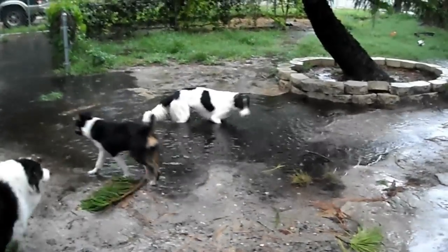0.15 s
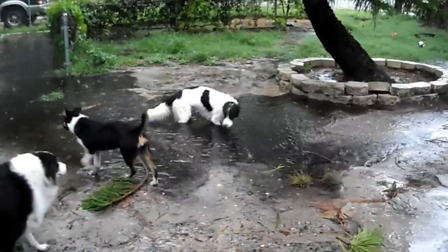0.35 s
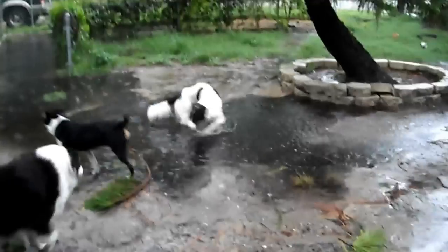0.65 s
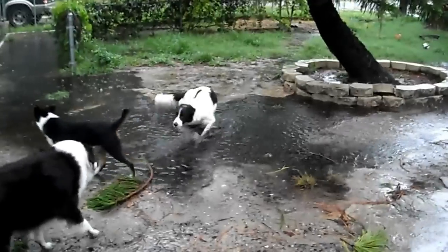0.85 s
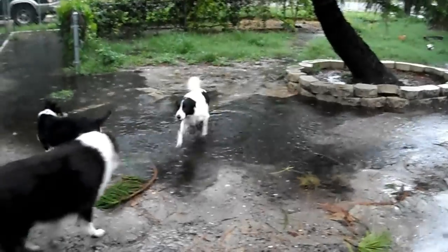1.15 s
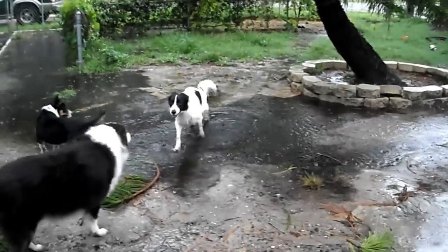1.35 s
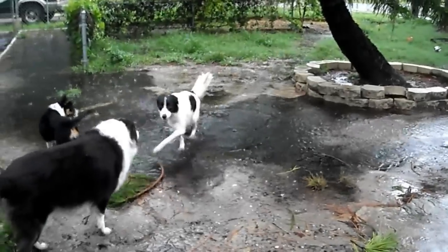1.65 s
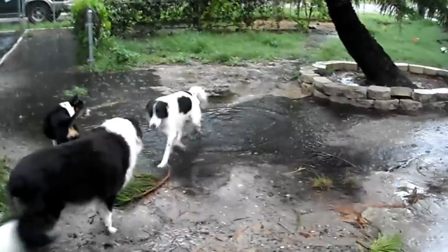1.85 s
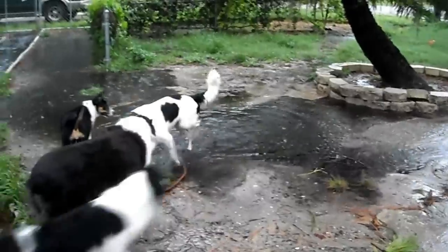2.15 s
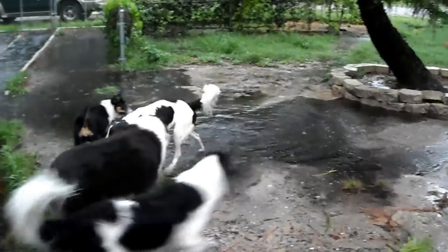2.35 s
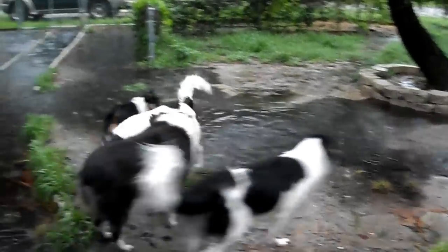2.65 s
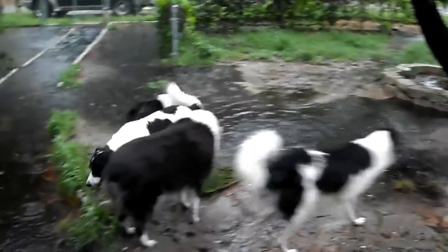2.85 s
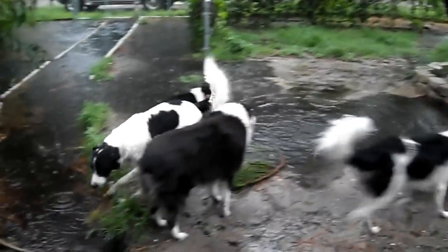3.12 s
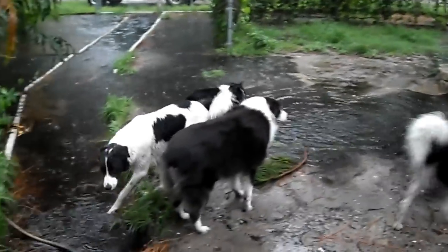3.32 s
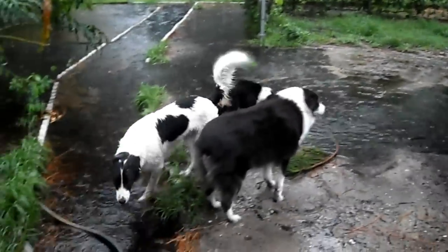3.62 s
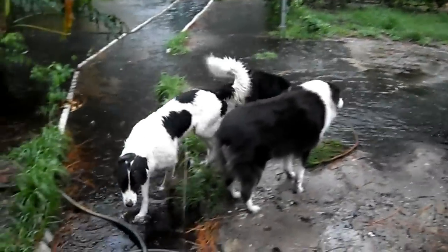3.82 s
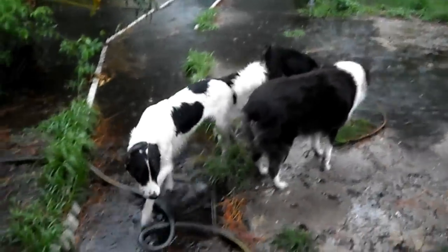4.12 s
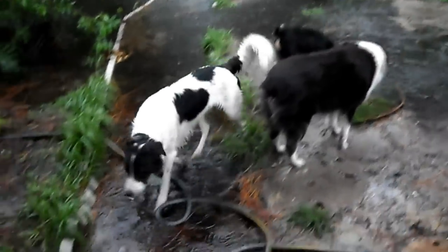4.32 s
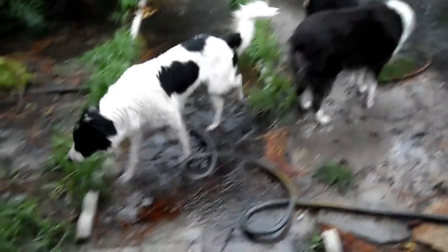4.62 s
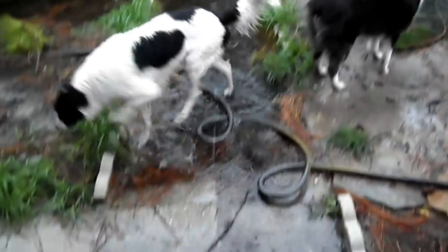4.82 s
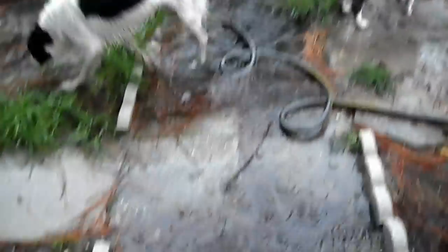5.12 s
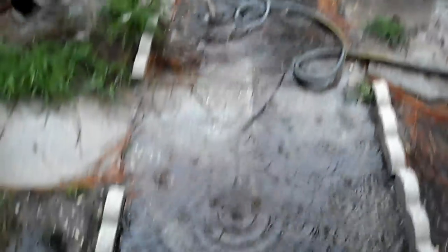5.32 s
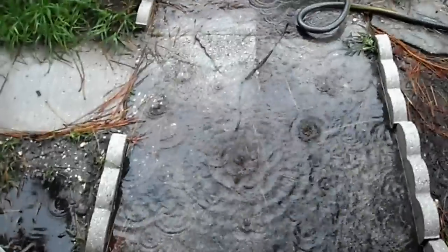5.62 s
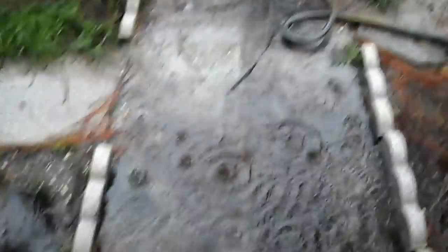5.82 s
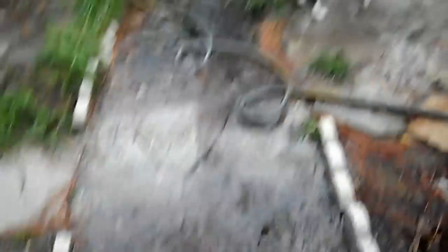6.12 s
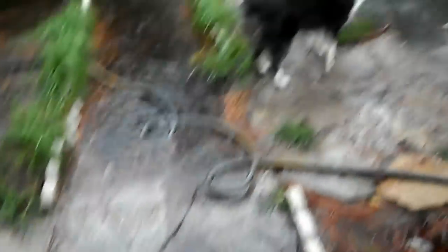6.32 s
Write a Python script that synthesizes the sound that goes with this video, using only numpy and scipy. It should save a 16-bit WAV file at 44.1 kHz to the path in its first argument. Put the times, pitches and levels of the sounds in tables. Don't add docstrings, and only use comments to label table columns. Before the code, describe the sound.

A small close microphone, practically mono, hears steady rain on puddles. Distant drops blur into a quiet hiss with a faint low hum; nearer ones fizz, click and plip with short rising bubble notes. Hard, dry taps of drops on the housing stand far above the rest early on. Two abrupt silences interrupt the start, then splashes become denser until the end.

```python
import sys
import numpy as np
from scipy import signal
from scipy.fft import rfft, irfft
from scipy.io import wavfile
from scipy.ndimage import uniform_filter1d

SR = 44100
rng = np.random.default_rng(int(sys.argv[2]) if len(sys.argv) > 2 else 0)


def wrap_up_sound(samples):
    columns = np.atleast_2d(samples).T
    tamed = np.clip(columns, -1, 1)
    steps = np.round(tamed * 32767).astype(np.int16)
    wavfile.write(sys.argv[1], SR, steps)


def attenuation_scalar(level_db):
    decades = np.asarray(level_db, float) / 20
    return 10 ** decades


N = 285327

# (frequency [Hz], density [dB per Hz])
WASH_SPECTRUM = [(25, -11.5), (40, -7.5), (56, 1.5), (80, -4), (110, -4), (200, -5.5), (420, -4), (700, -1),
                 (2300, -1.5), (3400, -3), (5200, -5.5), (9000, -9), (12000, -12.5), (15600, -15)]
# (time [s], rain strength [dB])
RAIN_SWELL = [(0, -49), (.64, -47), (1.25, -47.5), (1.89, -47.5), (2.31, -47.5), (2.9, -47.5), (3.5, -47.5),
              (4.0, -48), (4.6, -47.5), (5.15, -47), (5.4, -48), (6.0, -47), (6.47, -48.5)]
# (time [s], peak [dB], centre [Hz])
SPLASHES = [(0.0532, -32, 8540), (0.7142, -27.5, 5040), (1.291, -30.5, 4870), (1.596, -25.5, 6690),
            (1.8384, -23, 5300), (2.3549, -27.5, 4530), (2.4115, -19, 10600), (2.558, -28, 9220),
            (3.4577, -27.5, 7600), (3.4978, -29, 5070), (3.601, -24.5, 8720), (3.636, -23, 6130),
            (3.6784, -31, 8980), (3.8375, -26, 9000), (4.0061, -22, 8430), (4.2494, -28.5, 6000),
            (4.4447, -25.5, 6430), (4.6525, -22.5, 7220), (4.7226, -23.5, 6160), (4.78, -23.5, 7140),
            (4.8503, -28, 9220), (5.0773, -28.5, 4840), (5.0968, -26, 7360), (5.1316, -30.5, 5270),
            (5.2231, -18.5, 6240), (5.3844, -24.5, 8600), (5.4519, -22, 5600), (5.5079, -24.5, 6310),
            (5.9089, -29.5, 5160), (6.0102, -24, 5300)]
# (time [s], peak [dB], centre [Hz])
FURTHER_SPRAYS = [(2.5092, -27, 11600), (2.7456, -27.5, 11510), (2.7694, -32, 13100), (3.0584, -32.5, 10800),
                  (3.1283, -31, 10000), (4.0517, -29, 8500), (4.056, -29, 14500), (4.027, -31, 8500),
                  (5.297, -28, 9000), (3.537, -29.5, 9800), (4.2398, -31.5, 13800), (4.2594, -28, 9860),
                  (4.4962, -25, 11100), (4.6294, -27, 13100), (4.7092, -27.5, 10200), (5.002, -28, 12800),
                  (5.0866, -24.5, 9930), (5.617, -30, 9050), (5.6494, -36.5, 11500), (5.7788, -36, 9510),
                  (6.4094, -24, 14300)]
# (time [s], peak [dB], pitch [Hz], slosh [dB])
BUBBLES = [(0.1528, -42, 2587, -7.5), (0.7527, -44.5, 3656, -2.5), (2.9596, -43.5, 703, -2),
           (0.915, -39.5, 761.3, -4), (1.2359, -42, 1500, -7.5), (1.4438, -39.5, 2520, -8.5),
           (2.7474, -44, 4175, -13), (1.6587, -47, 1453, 4), (1.7881, -44, 4180, -8.0),
           (1.8386, -41.5, 2680, -9.5), (2.356, -43, 3530, -11), (2.356, -44.5, 1374, -6.5),
           (2.4152, -48, 690, 1.5), (2.5018, -45.5, 2390, -8.0), (2.9347, -38.5, 2370, -12),
           (5.077, -40, 2325, -5.5), (3.6072, -43.5, 3890, 3.5), (3.6343, -41, 4890, -8.5),
           (3.6443, -43.5, 2630, -4), (4.002, -44.5, 2574, -2.5), (5.8577, -45.5, 2893, -5.5),
           (4.757, -42.5, 2825, -1), (4.9124, -40, 3050, -6.5), (5.0905, -39.5, 2807, -3),
           (5.1297, -44.5, 4565, -3.5), (5.307, -44.5, 2928, -1.5), (5.854, -35.5, 1721, -5.5),
           (6.1014, -42.5, 2040, -7.5), (6.1014, -41.5, 3267, -11.5), (6.2901, -37, 3140, -8.5)]
# (time [s], peak [dB], brightness [dB])
CRACKS = [(0.0549, -29.5, -0.5), (1.292, -23, -0.5), (1.8417, -31, 6.5), (1.849, -21.5, -1.5),
          (2.3567, -20.5, 5.5), (2.414, -17, 1), (2.572, -24, 2.5), (3.0168, -28, 3), (3.5986, -28, -3.5),
          (3.601, -26, -3), (3.6384, -18.5, 3.5), (4.0084, -21.5, -1.5), (4.4474, -31, -1.5),
          (4.6605, -26, -0.5), (4.7812, -25.0, -2), (4.784, -31, -1), (5.0085, -31, 4),
          (5.1324, -25.5, 2.5), (5.136, -19.5, 8.5), (5.2244, -22, -1.5), (4.915, -29, -7),
          (0.9579, -20.5, 4), (5.454, -21.5, 0.5), (5.4576, -22.5, 3), (5.652, -26, 2.5), (5.665, -26.5, 1),
          (5.7801, -29.5, 1.5), (6.2939, -24.5, -8), (4.3964, -29.5, 2), (6.3646, -29, 3)]
# (time [s], peak [dB], tilt above 6 kHz [dB per octave])
MIDDLE_HITS = [
    (.0742, -5.5, 1.5),
    (.9551, -27, -14),
    (.957, -21.5, -5.5),
    (1.7589, -5, 0),
    (3.3425, -22.5, -9.5),
]
# (time [s], peak [dB], tilt above 6 kHz [dB per octave])
EDGE_HITS = [
    (.8424, -9, 0.42),
]
# (frequency [Hz], level [dB], t60 [ms], lag [ms])
MIDDLE_RINGS = [(2530, -9.5, 5.3, 0.23), (3407, -3.5, 5.3, 0.22), (4017, -1, 3.4, 0.31),
                (6780, -2.5, 3.2, .25), (8416, -3.5, 3.6, 0.044), (9625, 4, 1.76, 0.121),
                (12130, -5, 1, 0.027), (13800, -1, 1.1, 0.136)]
# (frequency [Hz], level [dB], t60 [ms], lag [ms])
EDGE_RINGS = [(3338, -3.5, 4.8, .05), (4517, .5, 4.1, .4), (5780, -10, 5.5, .6), (8025, -4, 3.5, .55),
              (9520, 3.5, 2.3, 0.8), (10570, 7, 1.3, 0.69), (14810, 6.5, 1.1, .75)]
# (start [s], end [s])
GAPS = [
    (.2081, .6382),
    (1.89, 2.3101),
]
# (time [s], low edge [Hz], high edge [Hz])
PUFFS = [(1.027, 11000, 12400), (1.097, 9600, 11000), (2.699, 11000, 12400), (2.699, 13100, 14500),
         (2.838, 4300, 5200), (2.838, 8300, 11700), (2.838, 13800, 15200), (3.906, 6300, 7600),
         (3.906, 8300, 10400), (4.115, 12400, 13800), (4.812, 4700, 5700), (5.206, 5700, 7600),
         (5.206, 9600, 11000), (5.415, 6900, 9000), (5.415, 14500, 15800), (6.437, 5200, 6300),
         (6.437, 14500, 15800)]


def evened(x):
    return x / np.sqrt(np.mean(x ** 2) + 1e-20)


def add(mix, time_s, sound):
    part = mix[round(time_s * SR):][:len(sound)]
    part += sound[:len(part)]


def ring(t, hz, t60_s, rise=0.):
    phase = 2 * np.pi * hz * (t + rise * t ** 2 / (2 * t60_s))
    return attenuation_scalar(-60 * t / t60_s) * np.sin(phase)


def band(x, centre_hz, width_octaves):
    hz = np.fft.rfftfreq(len(x), 1 / SR) + 1
    bell = np.exp(-.5 * (np.log2(hz / centre_hz) / width_octaves) ** 2)
    return irfft(rfft(x) * bell, len(x))


def wash():
    patchy_db, flicker_db = 1.08, 0.93
    mean_db, bright_per_db = -47.5, -1.31
    hop, size = 128, 512
    frames, hz = N // hop + 5, np.fft.rfftfreq(size, 1 / SR)
    real, imag, patches = rng.standard_normal((frames, len(hz), 3)).T
    patches = uniform_filter1d(patches, size=10, axis=0)
    patches = evened(uniform_filter1d(patches, size=12, axis=1))
    flicker = evened(uniform_filter1d(rng.standard_normal(frames), size=5))

    time_s, strength_db = np.transpose(RAIN_SWELL)
    bright_db = bright_per_db * (strength_db - mean_db)
    frame_s = np.arange(frames) * hop / SR
    treble_share = np.clip(hz / 9000, 0, 1.3)[:, None]
    treble_db = flicker_db * flicker + np.interp(frame_s, time_s, bright_db)
    field = (real + 1j * imag) * attenuation_scalar(patchy_db * patches + treble_share * treble_db)
    white = evened(signal.istft(field, nperseg=size, noverlap=size - hop)[1][:N])

    colour_hz, colour_db = np.transpose(WASH_SPECTRUM)
    log_hz = np.log(np.fft.rfftfreq(N, 1 / SR) + 1)
    colour = attenuation_scalar(np.interp(log_hz, np.log(colour_hz + 1), colour_db))
    swell = attenuation_scalar(np.interp(np.arange(N) / SR, time_s, strength_db) + 3.5)
    return evened(irfft(rfft(white) * colour, N)) * swell


def patter(per_s, low_hz, high_hz, cycles, rise, spread_db, level_db):
    pitches = 24
    sign = np.sign(rng.random(N) - .5)
    size = attenuation_scalar(spread_db * np.minimum(rng.exponential(1, N), 4))
    drops = sign * size * (rng.random(N) < per_s / SR)
    kind = rng.integers(0, pitches, N)
    out, t = np.zeros(N), np.arange(1500) / SR
    for k, hz in enumerate(np.geomspace(low_hz, high_hz, pitches)):
        out += signal.oaconvolve(drops * (kind == k), ring(t, hz, cycles / hz, rise))[:N]
    return attenuation_scalar(level_db) * evened(out)


def crackle():
    drops = patter(per_s=260, low_hz=4000, high_hz=13000, cycles=4.5, rise=0., spread_db=2.3, level_db=-55.5)
    return band(drops, 9000, .9)


def plops():
    return patter(per_s=200, low_hz=1200, high_hz=5000, cycles=32., rise=.2, spread_db=4.2, level_db=-57.5)


def puffs(rain):
    length, level_db = 2048, -2.5
    out, hz = np.zeros(N), np.fft.rfftfreq(length, 1 / SR)
    for time_s, low_hz, high_hz in PUFFS:
        start = rng.integers(3 * SR, 6 * SR)
        other = rfft(rain[start:][:length]) * (hz > low_hz) * (hz < high_hz)
        add(out, time_s - length / 2 / SR, attenuation_scalar(level_db) * irfft(other) * np.hanning(length))
    return out * np.array([[1], [-1]])


def bubbles():
    t60_s, rise = .025, .2
    out, t = np.zeros(N), np.arange(4096) / SR
    onset = 1 - np.exp(-t / 0.0006)
    for time_s, peak_db, hz, slosh_db in BUBBLES:
        water = evened(band(rng.standard_normal(len(t)), hz, 0.57))
        slosh = attenuation_scalar(slosh_db - 60 * t / t60_s) * water
        add(out, time_s + .002, attenuation_scalar(peak_db + 6.5) * (ring(t, hz, t60_s, rise) + slosh) * onset)
    return out


def spray(peak_db, centre_hz, t60_s, width_octaves):
    t = np.arange(4096) / SR
    lumps_db = 1.6 * evened(uniform_filter1d(rng.standard_normal(len(t)), size=30))
    droplets = rng.standard_normal(len(t)) * attenuation_scalar(lumps_db)
    envelope = attenuation_scalar(-60 * t / t60_s) * (1 - np.exp(-t / 0.00047))
    return attenuation_scalar(peak_db - 16.0) * evened(band(droplets, centre_hz, width_octaves)) * envelope


def splashes():
    out, delay_s = np.zeros(N), .0012
    for time_s, peak_db, hz in SPLASHES:
        t60_s = .045 * attenuation_scalar(0.63 * (peak_db + 30.5))
        add(out, time_s + delay_s, spray(peak_db, hz, t60_s, width_octaves=0.33))
    for time_s, peak_db, hz in FURTHER_SPRAYS:
        add(out, time_s + delay_s, spray(peak_db, hz, t60_s=0.04, width_octaves=.3))
    return out


def cracks():
    out, t = np.zeros(N), np.arange(-128, 128) / SR
    for time_s, peak_db, bright_db in CRACKS:
        pulse = .4 * rng.standard_normal(len(t)) - 1. * (t == 0)
        click = band(pulse * attenuation_scalar(-60 * abs(t) / .001), 8000 * attenuation_scalar(bright_db), .5)
        add(out, time_s + t.min(), attenuation_scalar(peak_db - 0.5) * click / abs(click).max())
    return out


def ticks():
    out, t = np.zeros(N), np.arange(500) / SR
    for hits, rings in ((MIDDLE_HITS, MIDDLE_RINGS), (EDGE_HITS, EDGE_RINGS)):
        hz, ring_db, t60_ms, lag_ms = np.transpose(rings)[..., None]
        since = np.maximum(t - lag_ms / 1000, 0)
        swell = (1 - np.exp(-since * hz / 1.3)) ** 2
        parts = ring(since, hz, t60_ms / 1000) * swell
        octaves = np.log2(np.maximum(hz / 6000, 1))
        for time_s, peak_db, tilt_db in hits:
            body = (attenuation_scalar(ring_db + tilt_db * octaves) * parts).sum(axis=0)
            add(out, time_s, attenuation_scalar(peak_db) * body / abs(body).max())
    return out


def ground_scatter(near):
    t = np.arange(1500) / SR
    echoes = rng.standard_normal(len(t)) * attenuation_scalar(-60 * t / 0.015) * (t > .001)
    return attenuation_scalar(-20) * signal.oaconvolve(near, echoes / np.linalg.norm(echoes))[:N]


def scene():
    far = wash() + plops() + crackle()
    near = bubbles() + splashes() + cracks() + ticks()
    return np.tile(far + near + ground_scatter(near), (2, 1))


def low_pass(x):
    return signal.sosfilt(signal.butter(12, 17020, fs=SR, output="sos"), x)


def record(dry):
    hz, t = np.fft.rfftfreq(N, 1 / SR), np.arange(N) / SR
    response = attenuation_scalar(-52. * np.clip((hz - 15750) / 330, 0, 1)) * (hz > 20)
    live = np.prod([(t < start_s) | (t > end_s) for start_s, end_s in GAPS], axis=0)
    heard = irfft(rfft(dry) * response, N) * live
    mix = heard + puffs(heard[0])
    return low_pass(mix)


dry = scene()
out = record(dry)
wrap_up_sound(out)
```